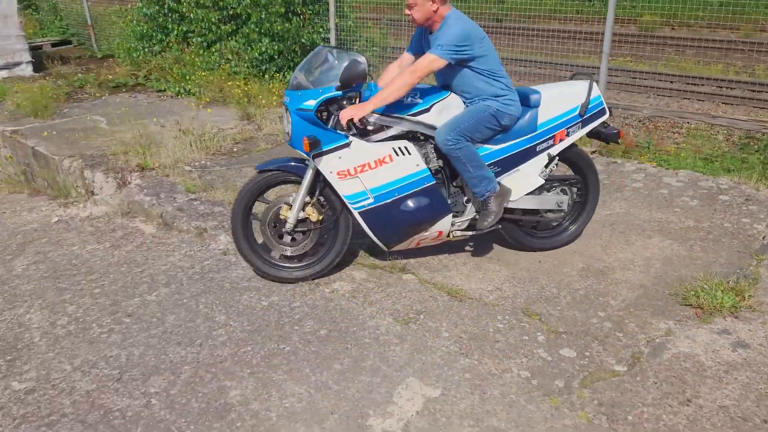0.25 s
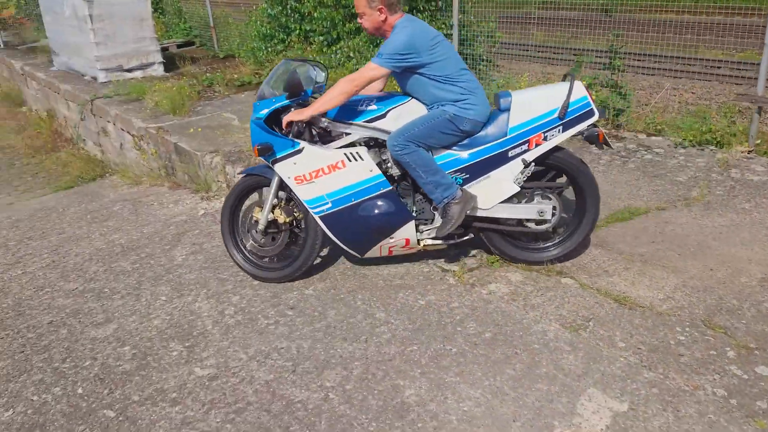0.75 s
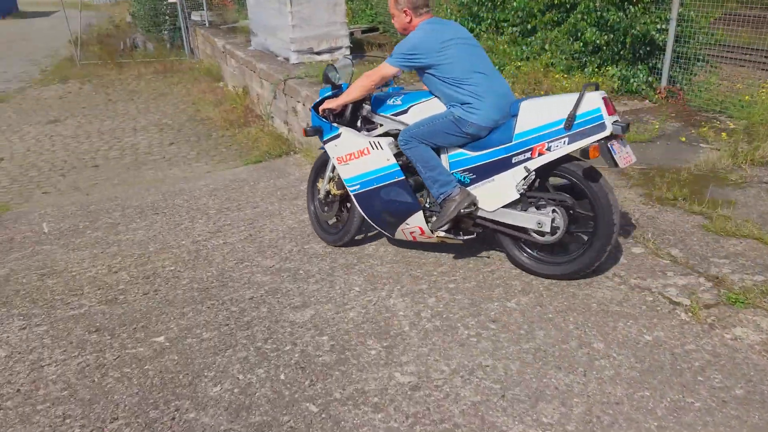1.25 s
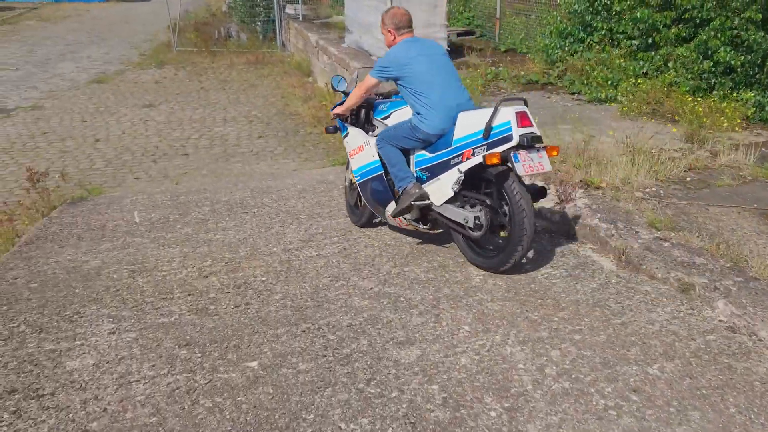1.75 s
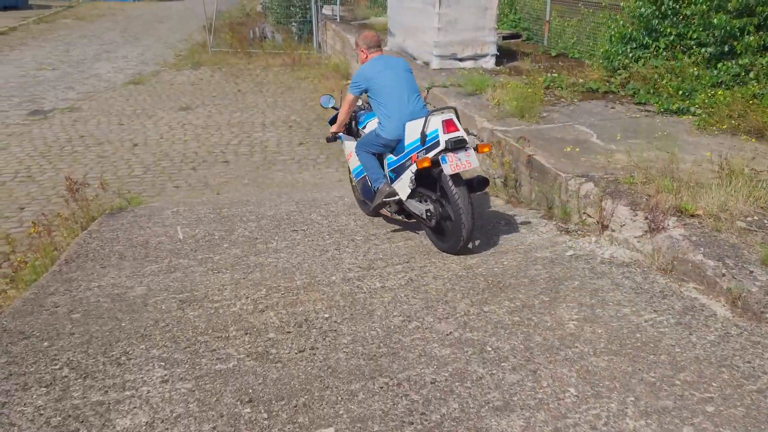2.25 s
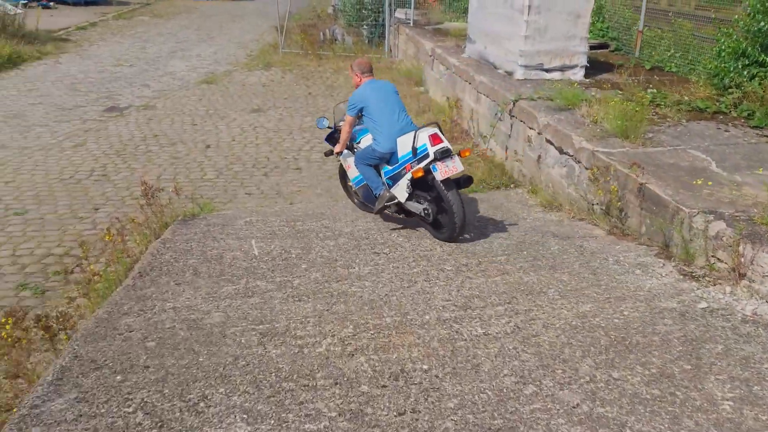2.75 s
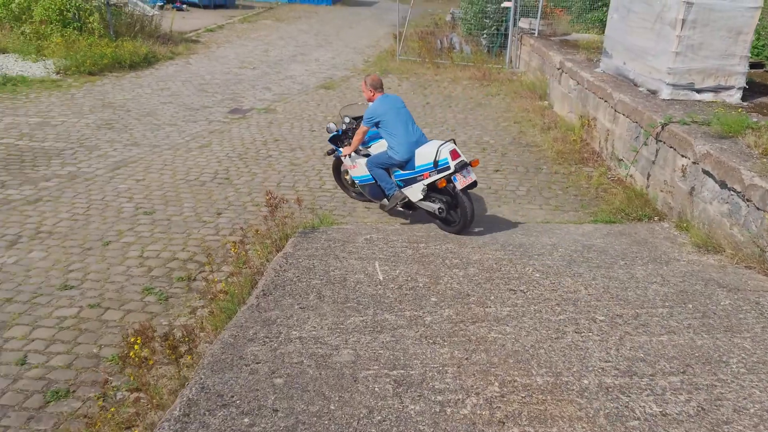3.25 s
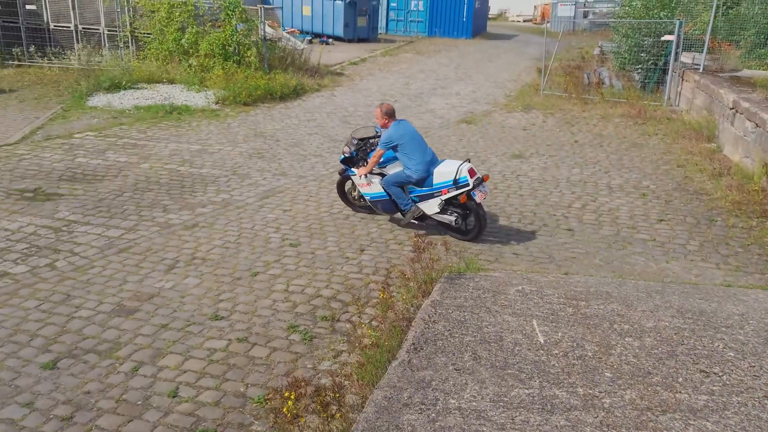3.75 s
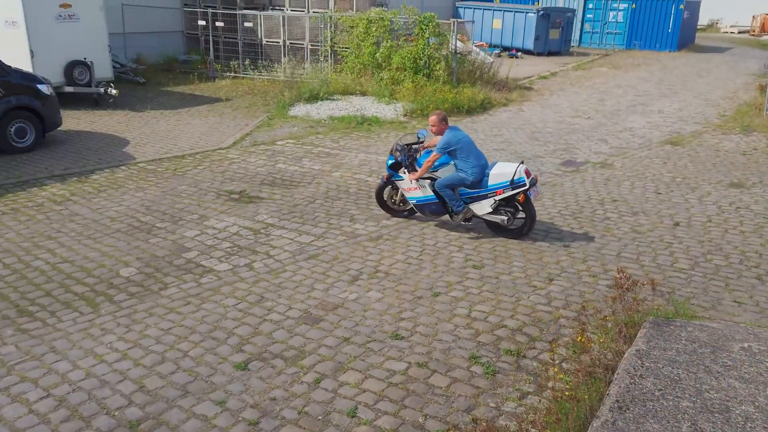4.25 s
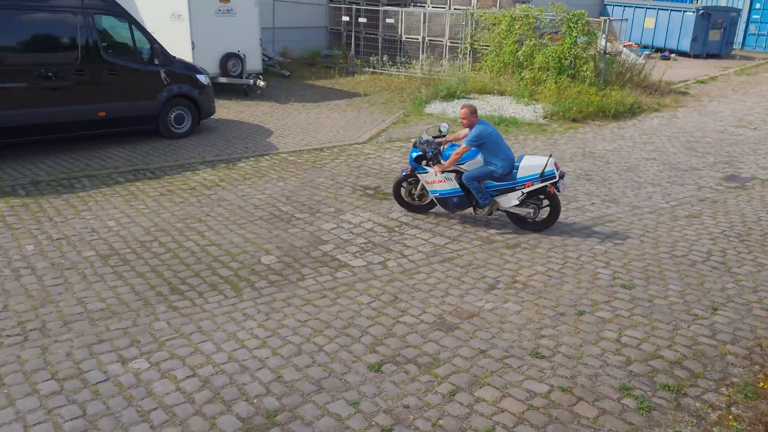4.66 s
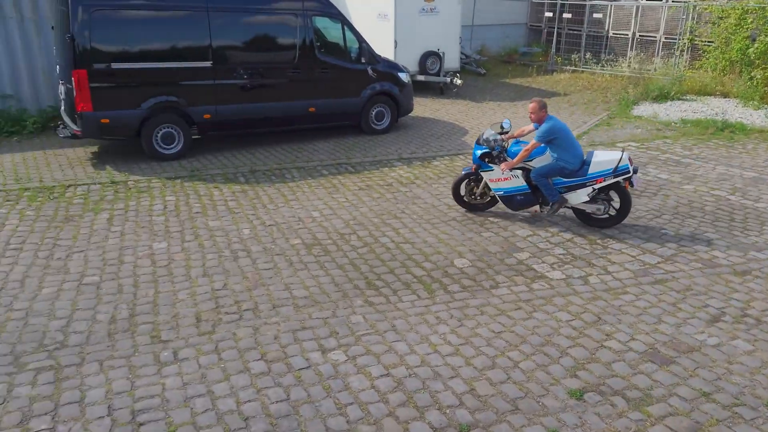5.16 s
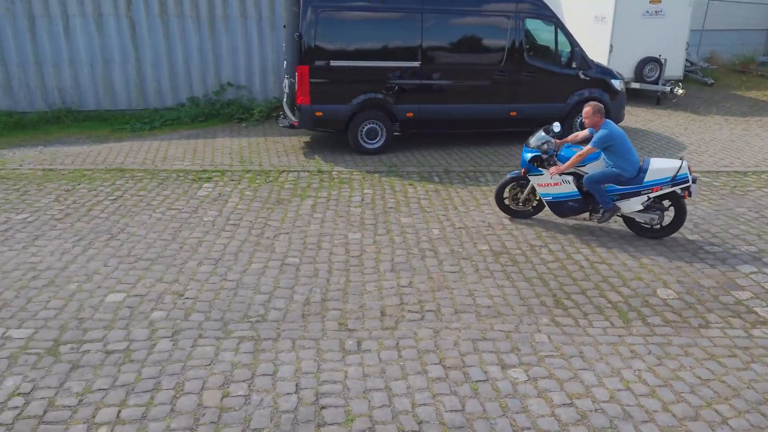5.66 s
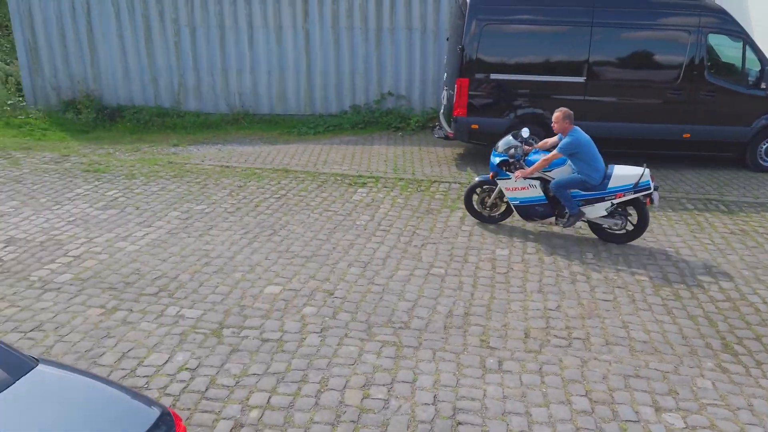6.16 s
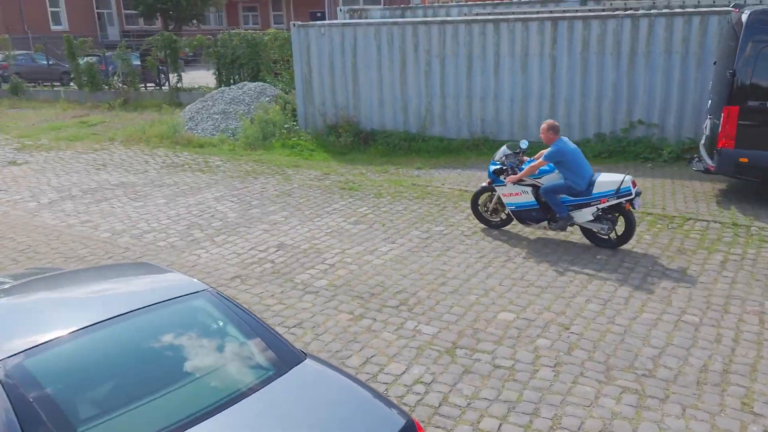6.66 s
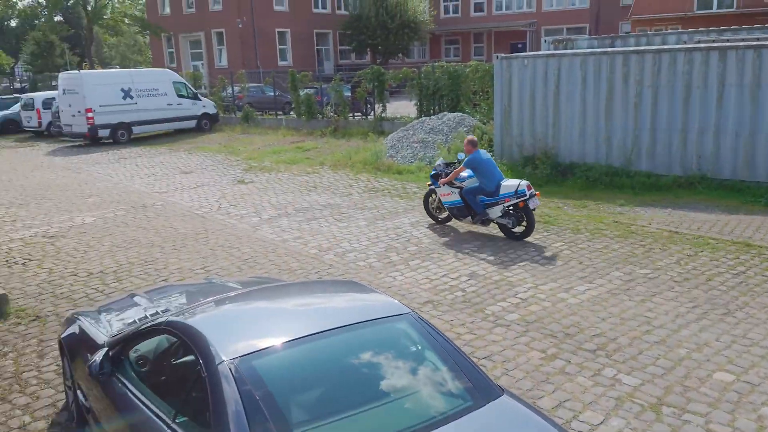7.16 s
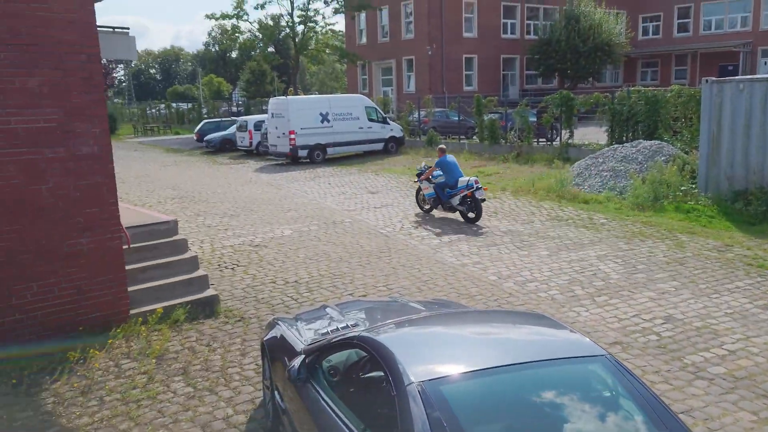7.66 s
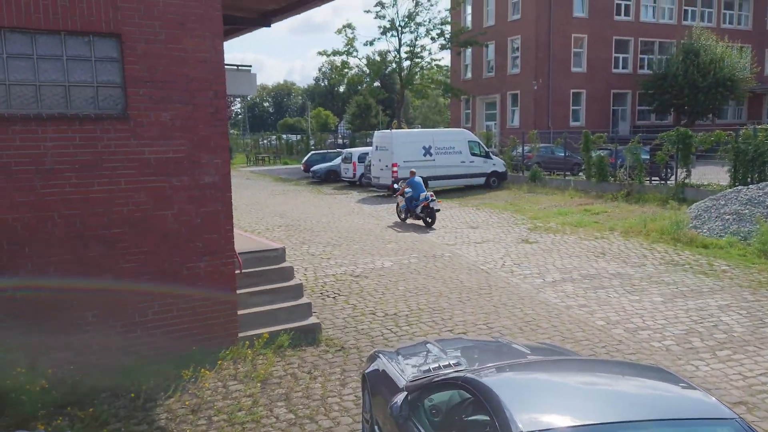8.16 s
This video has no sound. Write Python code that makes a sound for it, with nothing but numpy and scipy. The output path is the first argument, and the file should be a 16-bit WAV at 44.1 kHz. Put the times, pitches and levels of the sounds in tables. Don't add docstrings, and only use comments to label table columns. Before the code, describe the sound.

A four-cylinder motorcycle close to a small stereo microphone in a walled, cobbled yard. A short throaty rev drops into uneven idle with valve clatter, rattling covers and little metallic pings. It chugs and picks up, then pulls away with booming exhaust, honking intake and gear whine, until the throttle shuts at the end. Light wind rumbles underneath.

```python
import sys
import numpy as np
from scipy import signal
from scipy.fft import rfft, irfft, next_fast_len
from scipy.io import wavfile
from scipy.ndimage import uniform_filter1d, map_coordinates

SR = 44100
rng = np.random.default_rng(int(sys.argv[2]) if len(sys.argv) > 2 else 0)


def persist_wave(psi):
    counts = np.round(np.clip(psi, -1, 1) * 32767).astype(np.int16)
    wavfile.write(sys.argv[1], SR, np.atleast_2d(counts).T)


def amplitude_ratio(level_db):
    exponent = np.asarray(level_db, float) / 20
    return 10 ** exponent


N = 370440

# t/s, firing rate f/Hz
FIRING_RATE = [(.2, 67.3), (.53, 66.8), (.81, 84.74), (1.47, 37.6), (3.5, 37), (4.61, 44.38), (5.1, 70.04),
               (5.5, 55.5), (5.87, 59.1), (6.3, 124.6), (6.5, 128.8), (6.79, 125.5), (6.89, 116.1),
               (7.02, 128.9), (7.66, 161.2), (7.95, 150), (8.18, 115.6), (8.4, 126.3)]
# t/s, opening/0-1
THROTTLE_OPENING = [(0, 0.6), (.85, 0.73), (.9, 0.18), (4.6, 0.03), (4.95, 0), (5.2, 0), (5.4, 0.32),
                    (5.85, 0.89), (6.1, 0.81), (6.3, 1), (6.8, .95), (7.2, 1), (7.71, .92), (7.83, .17),
                    (8.05, 0.02), (8.2, 0.15), (8.4, 0.2)]
# t/s, engine nearness level/dB, silencer aim level/dB
RIDE_PATH = [(0, 10, 2), (.8, 8.5, 1), (1.3, 4.5, 1), (2.6, 1, 2.5), (3.3, 1.5, -3), (4.5, -2, -1.5),
             (5.3, 2.5, 1.5), (5.9, 3.5, -5.5), (6.5, 3, -3), (7.0, 3.5, -8.5), (7.6, -1, -6),
             (8.0, -5.5, -6), (8.4, -3, -6.5)]
STRONG_FIRINGS = [.031, .092, .152, .268, .383, .501, .561, .618, .673, 1.6, 1.818, 1.929, 2.042, 2.154,
                  2.266, 2.371, 2.481, 2.589, 2.701, 2.906, 3.227, 3.436, 3.639, 3.843, 4.031, 4.226, 4.42,
                  4.627, 4.885, 4.952, 5.02, 5.166, 5.391, 5.538, 5.759, 5.912]
# t/s, share/0-1
CLUTCH_BITE = [
    (.72, 1),
    (.9, 0),
]
# idle strength/1, idle lateness/ms, pull strength/1, pull lateness/ms
CYLINDER_PUSHES = [(.2, 8.2, .1, 0), (0, 0, .44, .3), (.1, .6, -.58, -.8), (-.15, 0, .16, .2)]
CYLINDER_CRACKS = [(-.45, 0, .02, .3), (-.33, 0, .08, 0), (.27, 0, -.24, -.8), (.52, 0, .08, 0)]
# t/s, half length/s, lope/1
LEAN_SPELLS = [
    (7.86, .1, .8),
    (4.9, .12, .4),
    (5.75, .25, .9),
]

# f/Hz, width/Hz, level/dB
SILENCER_MODES = [(47.4, 8, -6.5), (109.1, 11.5, 12), (148, 106, -8.5)]
HEADER_MODES = [(193.5, 49, 3), (273.3, 72.5, 4), (325, 42, 2)]
COLLECTOR_MODES = [(178, 86, -3)]
TAILPIPE_MODES = [(364, 37, 4), (489, 45, 2.5), (591, 71, 2.5)]
CHUG_MODES = [(58.6, 23, -32)]
AIRBOX_MODES = [(895, 28, -1), (972, 79, 3.5), (1180, 57.5, 1)]
SNORKEL_MODES = [(1181, 51, 0)]
CASING_MODES = [(1385, 120, -1), (1685, 130, 1)]

# t/s, half length/s, level/dB
PIPE_SURGES = [(4.78, 0.013, -8), (5.02, .02, 2.5), (5.09, .03, -3), (5.425, 0.0098, -8), (5.5, .014, -7),
               (5.72, 0.014, -8), (5.79, 0.011, -8), (5.86, 0.0097, -10), (5.92, .03, 3), (7.92, .015, -7),
               (8.12, .03, -5), (8.21, .03, 2), (8.395, .02, -5), (.01, 0.011, -4), (.67, 0.013, -6),
               (.79, 0.035, 0.5), (1.05, 0.045, -2), (1.2, 0.044, 5.5), (4.88, 0.13, 3.5),
               (5.06, 0.016, -4), (5.47, 0.18, -5.5), (5.6, 0.048, 5.5), (6.04, 0.039, 3.5),
               (6.12, 0.015, -9), (6.94, 0.066, 4.5), (7.36, 0.19, -2), (7.47, 0.032, -20),
               (7.57, 0.044, 2), (7.65, .03, -1), (7.81, 0.12, -3)]
# t/s, half length/s, level/dB
HEADER_SURGES = [(4.87, .05, -3), (5.93, .03, 2.5), (7.735, 0.013, -9), (.3, 0.12, 5), (1.1, 0.23, -8.5),
                 (4.8, 0.091, 1), (5.05, 0.18, 6.5), (5.45, 0.082, 8), (5.9, 0.04, 0.5), (6.35, 0.05, -3),
                 (6.6, 0.27, -2.5), (6.85, 0.059, 4.5), (7.3, 0.16, -2.5), (7.82, 0.039, 5.5),
                 (7.93, .05, 1), (8.25, 0.21, 5)]
# t/s, half length/s, roughness removed/0-1
SMOOTH_SPELLS = [
    (5.12, .22, .5),
    (7.84, .12, .9),
]
# t/s, half length/s, level/dB
TAILPIPE_SWELLS = [
    (5.6, .25, -7),
    (8.1, 0.13, -6),
    (6.5, 0.13, 3),
    (6.72, 0.046, -5),
    (6.86, .05, -4),
    (6.97, .05, 0),
    (7.2, .1, 0.5),
]
# t/s, half length/s, intake level/dB
HARD_PULLS = [
    (6.36, 0.16, -36),
    (6.65, 0.48, -26),
    (7.185, 0.17, -26),
    (7.504, 0.27, -33.5),
]
# t/s, half length/s, level/dB
AIRBOX_GULPS = [
    (6.48, 0.057, 3),
    (6.72, 0.043, -3),
    (6.84, .04, 2),
    (7.0, 0.067, 0),
    (7.22, 0.059, 1),
    (7.33, .03, 1),
    (7.41, .04, 4.5),
    (7.48, .03, -1),
    (7.54, .03, 4),
]
# t/s, half length/s, level/dB
SNORKEL_RINGS = [
    (6.48, 0.068, -40),
    (6.78, .04, -38),
    (7.09, .04, -33),
    (7.19, .04, -32),
    (7.35, 0.041, -43),
]

# f/Hz, t60/s
YARD_DECAY = [(100, 1), (1000, 0.12), (10000, 0.0064)]
# f/Hz, density level/dB
BLOCK_SPECTRUM = [(210, 6), (350, -1), (409, -1), (449, -4.5), (732, 0.5), (1030, -3.5), (1180, -5),
                  (1500, -6), (1830, -6), (2110, -8), (2550, -9.5), (2860, -14.5), (4200, -10.5),
                  (5460, -57), (9240, -120)]
VALVE_SPECTRUM = [(1880, -38), (3200, 0), (3580, 2), (3880, -12), (4520, 5), (5100, -4), (6880, -12),
                  (7600, -5.5), (7960, -5), (9400, -9.5), (12300, -10), (14800, -18), (15700, -21)]
# t/s, peak level/dB
KNOCKS = [(0.035, -9), (0.725, -19), (0.8884, -3), (1.4466, -26), (1.591, -15), (1.6978, -21),
          (1.7799, -20), (2.1485, -18), (2.425, -14), (2.743, -16), (2.7881, -25), (2.8928, -13),
          (3.2941, -31), (3.45, -17), (3.485, -13), (3.533, -13), (3.561, -11), (3.7244, -27),
          (3.8332, -31), (3.9806, -13), (4.153, -13), (4.207, -19), (4.262, -12), (5.797, -13),
          (6.6993, -14), (6.7907, -5), (7.0825, -11), (7.144, -28), (7.5082, -22), (8.043, -23)]
# t/s, half length/s, level/dB
COBBLES = [
    (.03, 0.0098, 0),
    (.82, 0.056, -1),
    (3.55, 0.039, 2.5),
    (4.28, 0.065, 5),
    (8.05, 0.035, 3.5),
]
# t/s, half length/s, f/Hz, level/dB
BAND_ECHOES = [(3.28, .12, 420, 6), (3.9, .1, 500, -7), (5.7, .3, 340, 0), (5.05, .08, 540, 5),
               (1.53, .1, 6800, -4), (.4, 0.56, 3370, -5.5), (3.45, 0.27, 2840, -4), (0.53, 0.46, 1630, 5),
               (0.21, 0.16, 1400, 7.5), (0.31, 0.59, 7800, 1.5), (6.9, 0.84, 8200, -2.5),
               (7.34, 0.26, 720, -10), (1.53, 0.11, 6500, -7), (6.4, 1.04, 7460, -8), (4.24, 0.18, 520, -3),
               (2.54, .2, 510, -3), (0.66, 0.24, 4500, -4.5), (0.88, 0.18, 610, 9.5), (1.44, 0.43, 950, 7),
               (3.4, 0.65, 2620, -0.5), (4.9, 1.2, 2570, -5), (2.1, 0.32, 1100, -6.5),
               (3.94, 0.74, 1220, -11), (2.1, 0.37, 1980, -3.5), (4.7, 1.2, 2090, -7),
               (3.26, 0.47, 2160, 5), (2.96, 1.14, 1550, 6), (4.8, 1, 450, 5.5), (4.87, 0.72, 666, 9),
               (4.94, 0.42, 2870, 4.5), (5.9, 0.72, 1523, -8), (5.94, 0.96, 1870, 5.5),
               (8.06, 0.69, 1550, -18), (8, 0.71, 2140, -6.5), (8.03, 0.38, 1630, 11.5),
               (1.5, 4.2, 452, -11.5), (7, 1.8, 413, -11.5), (6.6, 1.6, 378, -10), (7.65, 0.55, 4680, 4),
               (5.2, 0.34, 9300, 5)]
# t/s, half length/s, level/dB
GUSTS = [
    (0, 0.14, 12.5),
    (.8, 0.57, 16),
    (1.7, 0.42, 15),
    (2.6, .6, 15),
    (3.6, 0.5, 9),
    (4.5, .2, 9),
    (5.7, .4, 5),
    (6.6, 0.23, 22),
    (6.95, 0.078, 10),
    (7.85, 0.26, 4),
]
# t/s, peak level/dB, f/Hz
TAPPET_PINGS = [(1.2547, -28, 1460), (1.4468, -29, 1400), (1.5904, -26, 2250), (1.6986, -21, 1660),
                (1.78, -22, 1710), (2.081, -25, 1450), (2.1492, -37, 1510), (2.424, -26, 1700),
                (2.5478, -29, 2160), (2.666, -27, 2190), (2.7408, -27, 1970), (2.7882, -32, 1510),
                (2.893, -23, 2860), (2.9339, -28, 2060), (3.005, -24, 1690), (3.2177, -41, 1530),
                (3.2951, -25, 2070), (3.3375, -33, 2160), (3.3734, -30, 2150), (3.4283, -21, 2120),
                (3.5615, -21, 2830), (3.7246, -24.5, 1620), (3.8333, -26, 2920), (4.025, -27, 1530),
                (4.153, -21, 1950), (4.207, -20, 2850), (5.1778, -22, 2950), (5.2486, -29, 1370),
                (5.6871, -27, 1890), (5.796, -17, 1940)]
# t/s, level/dB
TYRE_SCRUB = [
    (1.42, -54),
    (1.52, -37.5),
    (1.6, -42),
    (1.68, -51),
]
# t/s, half length/s, level/dB
TOOTH_SONG = [
    (6.52, 0.086, -35),
    (6.63, 0.068, -36),
    (6.74, .05, -30.5),
    (7.19, 0.13, -29),
    (7.4, 0.094, -37),
    (7.57, 0.1, -35),
]
# t/s, wander/rad
TOOTH_WANDER = [
    (6.8, .55),
    (7.05, 1.7),
    (7.3, 1.6),
    (7.5, 1.1),
]
# f/Hz, likeness/0-1
PORT_LIKENESS = [(300, .97), (900, .88), (1400, .5), (2400, .4), (4600, .55), (7000, .1)]
# f/Hz, left minus right level/dB
PORT_COLOUR = [(60, 5.5), (130, 0.5), (250, -2.5), (700, 0.5), (1000, -2.5), (1400, 7.5), (1900, -2),
               (2800, -14), (4200, 3.5), (5500, -9.5), (7500, -23), (10000, -5), (15000, -10)]

IDLE_HZ = 37
TUNED_HZ, TUNED_WIDTH_HZ, TUNED_DB = 129, 15, 8.5
SILENCER_LAG_S = .0012
LOPE_SHUT, LOPE_OPEN = .8, .03
ALTERNATION_ALWAYS, ALTERNATION_PART = .015, .28
MISFIRE_SHUT, MISFIRE_OPEN, MISFIRE_OVERRUN = .14, .03, .17
EVEN_THROTTLE = .88
SURGE_SHARE = 0.43
TEETH_PER_FIRING = 21.3
COVER_LOAD_DB = -10
ECHO_HALF_WIDTH_OCT = 0.09
PING_T60_S = 0.022
BREEZE_DB = -57
# level/dB at idle, dB per octave of speed, dB at full throttle, share of nearness
GROWL, BARK, RING = (-36, 5, 11.5, 0.38), (-59, 7, 14.5, -0.25), (-32, 5.5, 7, 1)
CLATTER, HISS = (-43, 4.5, 3.5, 0.2), (-48.5, 7, 1, 1)
UPPER, LOWER = (-43, 2, 6, 0), (-45.5, -0.5, 8, 0.5)


def unit(x):
    return x / np.sqrt(np.mean(x ** 2) + 1e-20)


def steady(x, seconds):
    size = int(seconds * SR)
    power = uniform_filter1d(uniform_filter1d(x ** 2, size), size)
    return x / np.sqrt(np.abs(power) + 1e-12)


def along(points, hz):
    f, v = np.transpose(points)
    return np.interp(np.log(hz + 1), np.log(f + 1), v)


def curves(rows):
    s, *cols = np.transpose(rows)
    return [np.interp(np.arange(N) / SR, s, c) for c in cols]


def swells(rows):
    t = np.arange(0, N + 64, 64) / SR
    bells = sum(height * np.exp(-((t - s) / half) ** 2) for s, half, height in rows)
    return np.interp(np.arange(N) / SR, t, bells)


def gains(rows):
    return swells([(s, half, amplitude_ratio(db)) for s, half, db in rows])


def wobble(rate_hz):
    knots = rng.standard_normal(int(N * rate_hz / SR) + 4)
    return map_coordinates(knots, [np.arange(N) * rate_hz / SR])


def filtered(x, response):
    m = next_fast_len(N + SR // 2)
    return irfft(rfft(x, m) * response(np.fft.rfftfreq(m, 1 / SR)), m)[..., :N]


def modes(table):
    return lambda f: sum((-1) ** k * amplitude_ratio(db) * 1j * f * w / (c * c - f * f + 1j * f * w)
                         for k, (c, w, db) in enumerate(table))


def rung(x, table, lead_s=0):
    return filtered(x, lambda f: modes(table)(f) ** 2 * np.exp(2j * np.pi * f * lead_s))


def firing_hz():
    return curves(FIRING_RATE)[0]


def throttle():
    return np.clip(curves(THROTTLE_OPENING)[0], 0, 1)


def level_db(law):
    idle_db, octave_db, open_db, share = law
    speed_db = octave_db * np.log2(firing_hz() / IDLE_HZ)
    return idle_db + speed_db + open_db * throttle() + share * curves(RIDE_PATH)[0]


def crank():
    count = np.cumsum(firing_hz()) / SR
    at = np.multiply(STRONG_FIRINGS, SR)
    slip = np.unwrap(3 - count[at.astype(int)], period=4)
    return count + np.interp(np.arange(N), at, slip) - np.floor(slip[0] / 4) * 4


def mixture():
    shut = np.clip(1 - throttle() / EVEN_THROTTLE, 0, 1)
    coasting = np.clip(firing_hz() / IDLE_HZ - 1, 0, 1)
    lope = LOPE_OPEN + (LOPE_SHUT - LOPE_OPEN) * shut + swells(LEAN_SPELLS)
    alternation = ALTERNATION_ALWAYS + ALTERNATION_PART * 4 * shut * (1 - shut)
    misfire = MISFIRE_OPEN + (MISFIRE_SHUT - MISFIRE_OPEN) * shut + MISFIRE_OVERRUN * shut ** 2 * coasting
    return lope, alternation, misfire


def firings(count, lope, alternation, misfire, pattern=CYLINDER_PUSHES):
    at = np.flatnonzero(np.diff(np.floor(count)))
    cylinder = np.floor(count[at + 1]).astype(int) % len(pattern)
    extra, late_ms, pull_extra, pull_ms = np.transpose(pattern)[:, cylinder]
    chance = rng.standard_normal((1200, 2))[:len(at)]
    pull = curves(CLUTCH_BITE)[0][at]
    idle_extra = lope[at] * extra - alternation[at] * np.cos(np.pi * cylinder)
    size = 1 + (1 - pull) * idle_extra + pull * pull_extra + misfire[at] * chance[:, 0]
    gap = np.gradient(at) / SR * 36
    idle_ms = (1 - pull) * lope[at] * late_ms + 3 * misfire[at] * chance[:, 1]
    late_ms = gap * idle_ms + pull * pull_ms
    return np.bincount(np.clip(at + (late_ms * SR / 1000).astype(int), 0, N - 1), size, N)


def silencer(push):
    tuned_db = TUNED_DB / (1 + ((firing_hz() - TUNED_HZ) / TUNED_WIDTH_HZ) ** 2)
    boom_db = -22 + 7 * throttle() + curves(RIDE_PATH)[1] + tuned_db + swells(PIPE_SURGES)

    def can(f):
        lowpass = 1 / (1 + 1j * f / 260) ** 2
        highpass = (1j * f / (45 + 1j * f)) ** 2
        return modes(SILENCER_MODES)(f) * lowpass * highpass * np.exp(-2j * np.pi * f * SILENCER_LAG_S)

    return -amplitude_ratio(boom_db) * steady(filtered(np.sqrt(np.abs(push)), can), 0.16)


def headers_db():
    return level_db(GROWL) + SURGE_SHARE * swells(PIPE_SURGES) + swells(HEADER_SURGES) - 5.5


def headers(count, puff):
    lope, alternation, misfire = mixture()
    rough = 1 - swells(SMOOTH_SPELLS)
    crack = firings(count, np.minimum(lope, LOPE_SHUT) * rough, alternation * rough / 2, misfire * rough,
                    CYLINDER_CRACKS)
    crack = np.clip(crack, 0, 1.55) ** 2.5
    growl = -steady(rung(crack, HEADER_MODES, lead_s=.005), .2) + .15 * unit(rung(puff, HEADER_MODES))
    thud = steady(rung(crack, COLLECTOR_MODES, lead_s=.0028), .2)
    thud_gain = amplitude_ratio(COLLECTOR_MODES[0][-1]) * np.clip(1 - 4 * throttle(), 0, 1)
    return amplitude_ratio(headers_db()) * (growl + thud_gain * thud)


def tailpipe(push):
    rasp = steady(rung(push, TAILPIPE_MODES), 0.15)
    rasp = rasp * np.clip(firing_hz() / 110, 0, 1) ** 2 * amplitude_ratio(3.7 * wobble(30))
    return amplitude_ratio(headers_db()) * amplitude_ratio(swells(TAILPIPE_SWELLS) - 13.5) * rasp


def chug(push):
    gain = amplitude_ratio(CHUG_MODES[0][-1]) * swells(LEAN_SPELLS[1:])
    return gain * steady(rung(push, CHUG_MODES), 0.23)


def airbox(count, puff):
    lope, alternation, misfire = mixture()
    gulp = firings(count, lope / 2, alternation + .75, misfire * 2.2)
    bark = steady(rung(gulp, AIRBOX_MODES), .1) + .3 * unit(rung(puff, AIRBOX_MODES))
    bark_gain = amplitude_ratio(level_db(BARK) - 12.5) + amplitude_ratio(-4.0) * gains(HARD_PULLS)
    snort = gains(SNORKEL_RINGS) * steady(rung(gulp, SNORKEL_MODES), 0.084)
    return bark_gain * amplitude_ratio(swells(AIRBOX_GULPS) + 1.9 * wobble(30)) * bark + snort


def exhaust(count):
    push = firings(count, *mixture())
    puff = rng.standard_normal(N)
    return silencer(push) + headers(count, puff) + tailpipe(push) - chug(push) + airbox(count, puff)


def yard(x):
    hz, t, z = signal.stft(rng.standard_normal((2, SR // 2)), SR, nperseg=256)
    decay = amplitude_ratio(-60 * t / along(YARD_DECAY, hz)[:, None])
    tail = signal.istft(z * decay, SR, nperseg=256)[1]
    late = np.pad(x, (700, 0))[None]
    return signal.fftconvolve(late, tail / np.linalg.norm(tail[0]), axes=1)[:, :N]


def valve_gear(count):
    bumps_db = swells(COBBLES)
    clatter_db, hiss_db, ring_db = level_db(CLATTER) + bumps_db, level_db(HISS) + bumps_db, level_db(RING)
    turns_db = .9 * np.cos(2 * np.pi * count + 2.1) + .9 * np.cos(np.pi / 2 * count + 2.1)
    beat = amplitude_ratio(turns_db + .55 * wobble(11) + .6 * wobble(40))
    taps = amplitude_ratio(np.minimum(4 * rng.exponential(size=N), 12)) * (rng.random(N) < .004)
    shake = unit(beat) * (1 + .18 * unit(uniform_filter1d(taps, size=40)))
    fade = amplitude_ratio(-60 * np.arange(900) / SR / 0.04)
    for s, db in KNOCKS:
        at = round(s * SR)
        shake[at:][:900] *= 1 + amplitude_ratio(db - 29.5 - hiss_db[at]) * fade
    clatter, hiss, ring = rng.standard_normal((3, 2, N)) * shake
    clatter = unit(filtered(clatter, lambda f: amplitude_ratio(along(BLOCK_SPECTRUM, f)) / (1 + (100 / (f + 1)) ** 2)))
    hiss = unit(filtered(hiss, lambda f: amplitude_ratio(along(VALVE_SPECTRUM, f))))
    ring = unit(filtered(ring, lambda f: sum(np.abs(modes([mode])(f)) ** 2 for mode in CASING_MODES)))
    return amplitude_ratio(clatter_db + 5.5) * clatter + amplitude_ratio(hiss_db) * hiss + amplitude_ratio(ring_db - 20.5) * ring


def covers():
    shake = rng.standard_normal((2, N)) * amplitude_ratio(0.17 * wobble(34))
    upper = unit(rung(shake, [(2950, 450, 0)]))
    lower = unit(rung(shake, [(2120, 420, 0)]))
    upper_gain = amplitude_ratio(level_db(UPPER) - 6.5) + amplitude_ratio(COVER_LOAD_DB) * gains(HARD_PULLS)
    return upper_gain * upper + amplitude_ratio(level_db(LOWER) - 3.0) * lower


def patchy(x, depth_db):
    hz, t, z = signal.stft(x, SR, nperseg=512)
    field = rng.standard_normal((2,) + z.shape[1:])
    slow = uniform_filter1d(uniform_filter1d(field[0], size=150), size=150)
    slow = uniform_filter1d(slow, size=2, axis=0)
    quick = uniform_filter1d(uniform_filter1d(field[1], size=12), size=4, axis=0)
    s, half, centre_hz, db = np.transpose(BAND_ECHOES)[:, :, None]
    band = np.exp(-(np.log2((hz + 1) / centre_hz) / ECHO_HALF_WIDTH_OCT) ** 2)
    echo_db = band.T @ (db * np.exp(-((t - s) / half) ** 2))
    drift_db = depth_db * (.25 * unit(slow) + .7 * unit(quick))
    return signal.istft(z * amplitude_ratio(echo_db + drift_db), nperseg=512)[1][:, :N]


def spread(pair):
    turn = lambda hz: np.arccos(np.clip(along(PORT_LIKENESS, hz), -1, 1)) / 2
    mid, side = filtered(pair, lambda hz: np.array([np.cos(turn(hz)), np.sin(turn(hz))]))
    return np.array([mid + side, mid - side])


def wind():
    shared, own = rung(rng.standard_normal((2, N)), [(36, 20, 0)])
    buffet = unit(np.array([shared + 0.12 * own, shared - .1 * own]))
    return amplitude_ratio(BREEZE_DB + swells(GUSTS)) * buffet


def pings():
    out, t = np.zeros(N), np.arange(SR // 20) / SR
    for s, db, hz in TAPPET_PINGS:
        envelope = amplitude_ratio(db - 1.5 - 60 * t / PING_T60_S) * (1 - np.exp(-t / 0.0011))
        out[round(s * SR):][:len(t)] += envelope * np.sin(2 * np.pi * hz * t)
    return out * np.array([[1.2], [.5]])


def tyre():
    grit = rung(rng.standard_normal((2, N)), [(4600, 2000, 0)])
    return amplitude_ratio(curves(TYRE_SCRUB)[0]) * unit(grit)


def primary_gear(count):
    phase = 2 * np.pi * np.cumsum(TEETH_PER_FIRING * firing_hz()) / SR
    mesh = np.sin(phase + curves(TOOTH_WANDER)[0] * wobble(70))
    mesh = mesh * (1 + .5 * np.cos(np.pi * count)) * amplitude_ratio(1.5 * wobble(25))
    return amplitude_ratio(4) * gains(TOOTH_SONG) * mesh * np.array([[1], [.4]])


def scene():
    count = crank()
    pipes = exhaust(count)
    walls = amplitude_ratio(-23) * yard(pipes)
    metal = patchy(valve_gear(count) + covers(), depth_db=1.9) + pings() + primary_gear(count)
    return pipes + walls + spread(metal + tyre()) + wind()


def low_pass(x):
    return signal.sosfilt(signal.butter(12, 15790, fs=SR, output="sos"), x)


def record(dry):
    sides = np.array([[.5], [-.5]])

    def port(f):
        phase = f * 2.5e-4 - .65 / (1 + (f / 350) ** 2)
        return amplitude_ratio(sides * along(PORT_COLOUR, f)) * np.exp(1j * sides * phase)

    ports = filtered(dry, port)
    ports = ports / (1 + np.abs(ports / .95) ** 6) ** (1 / 6)
    return low_pass(ports)


dry = scene()
out = record(dry)
persist_wave(out)
```